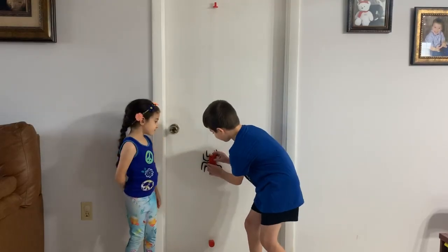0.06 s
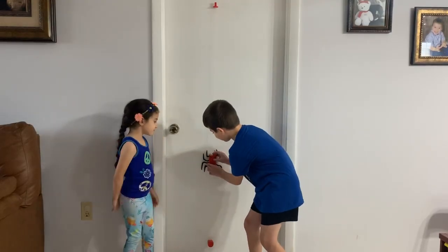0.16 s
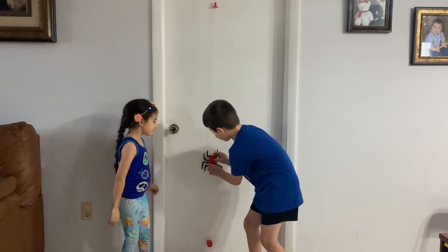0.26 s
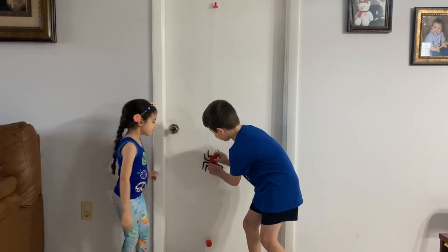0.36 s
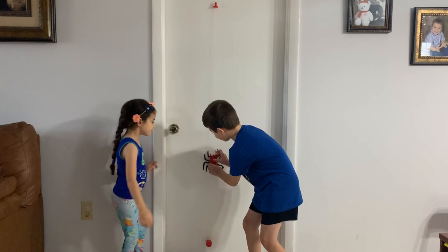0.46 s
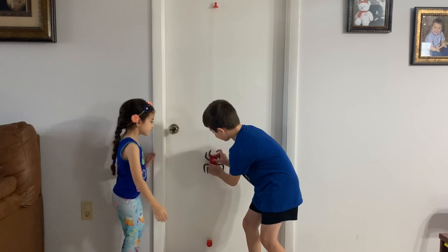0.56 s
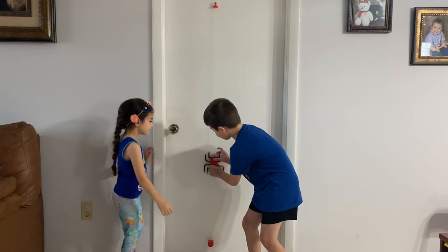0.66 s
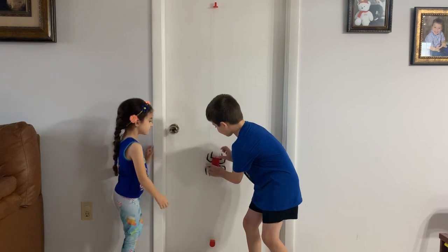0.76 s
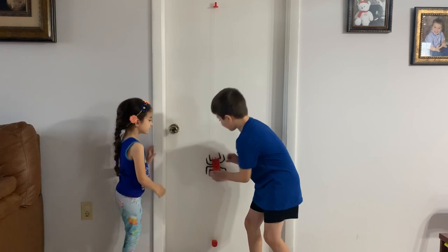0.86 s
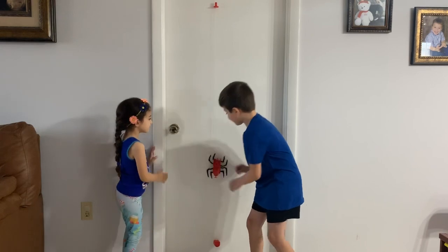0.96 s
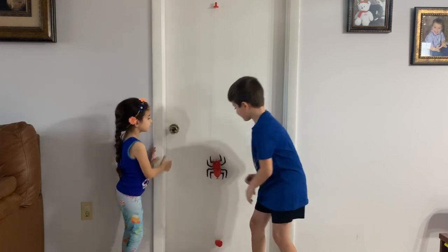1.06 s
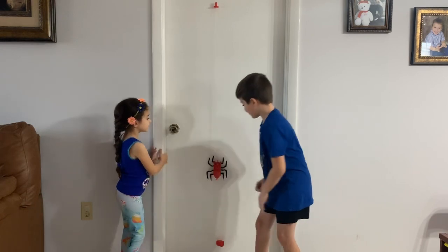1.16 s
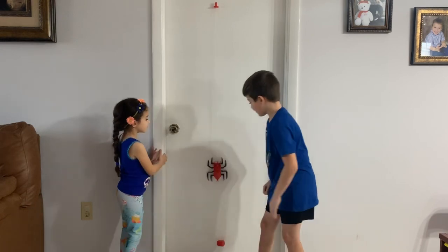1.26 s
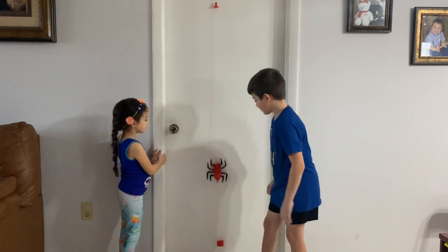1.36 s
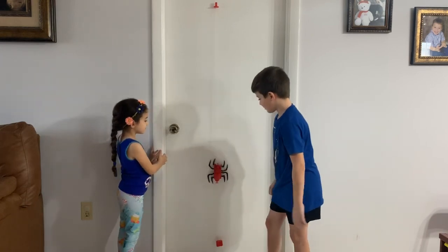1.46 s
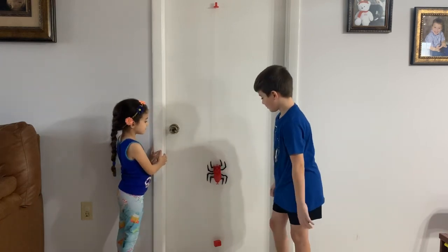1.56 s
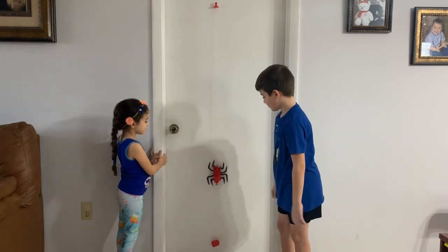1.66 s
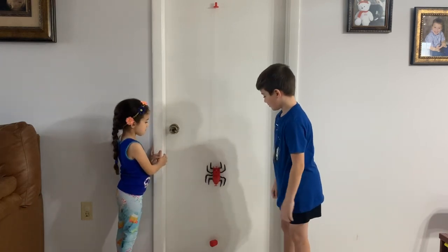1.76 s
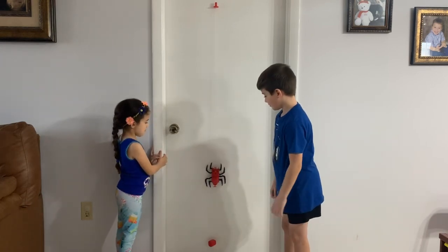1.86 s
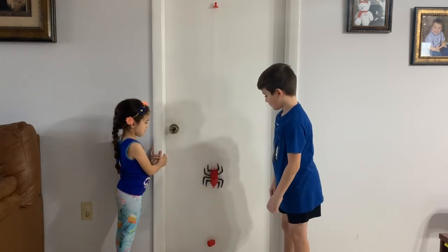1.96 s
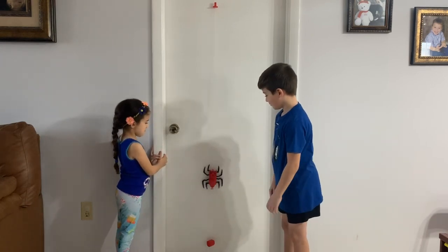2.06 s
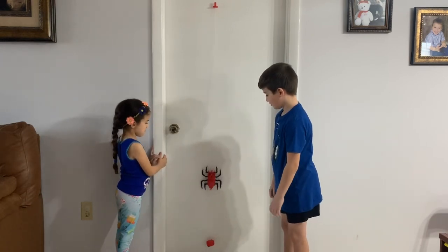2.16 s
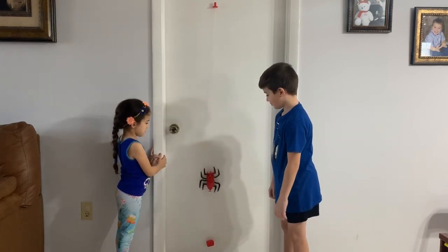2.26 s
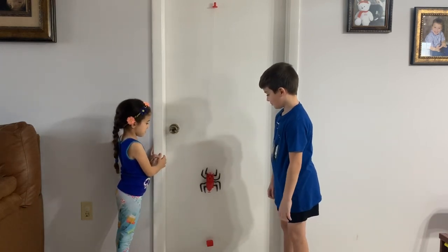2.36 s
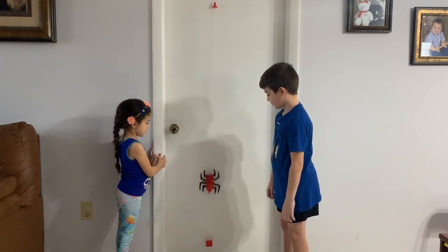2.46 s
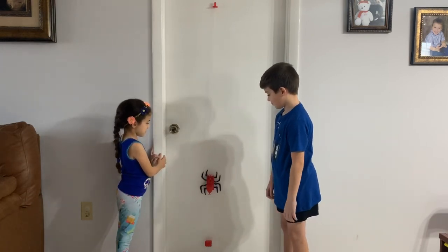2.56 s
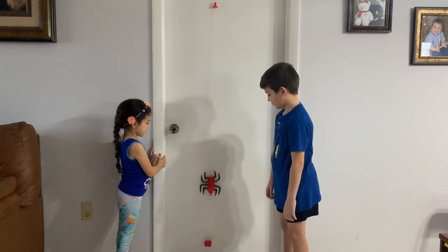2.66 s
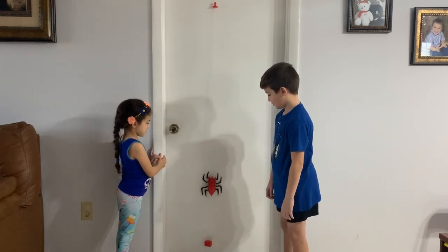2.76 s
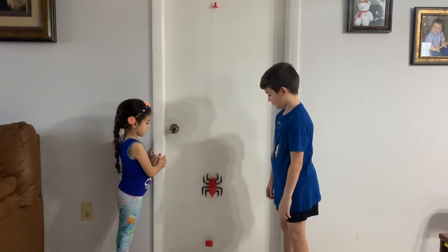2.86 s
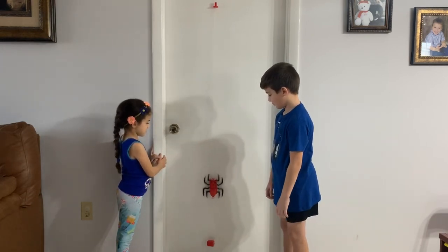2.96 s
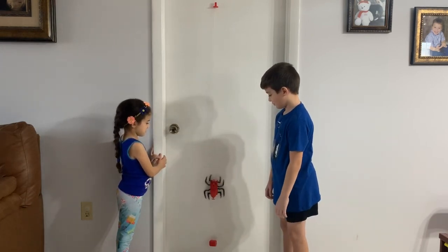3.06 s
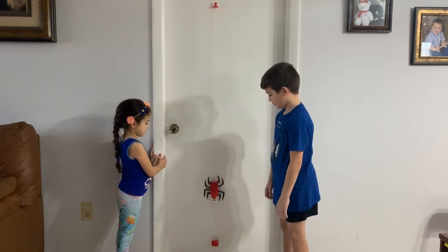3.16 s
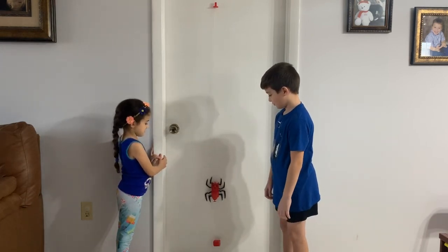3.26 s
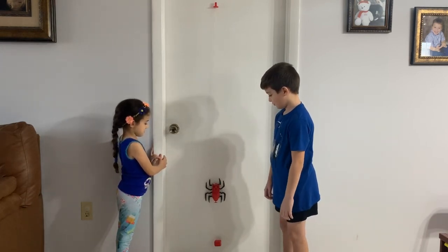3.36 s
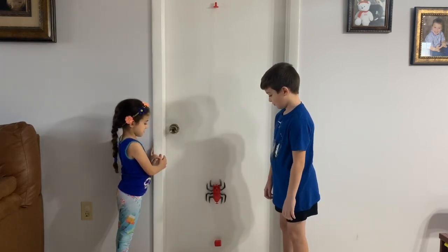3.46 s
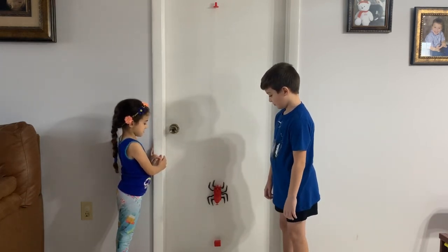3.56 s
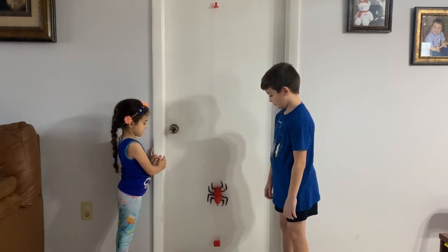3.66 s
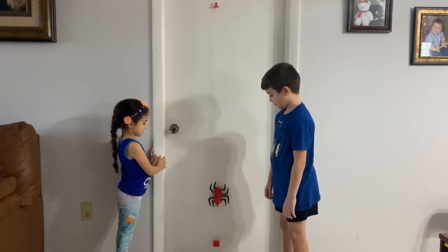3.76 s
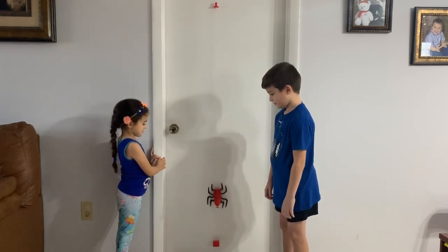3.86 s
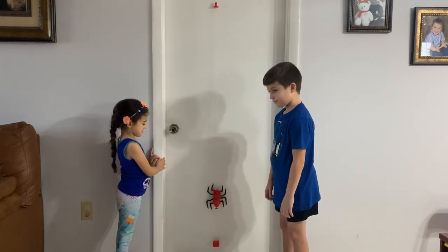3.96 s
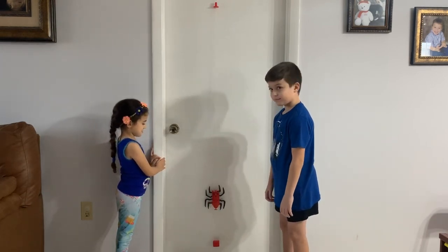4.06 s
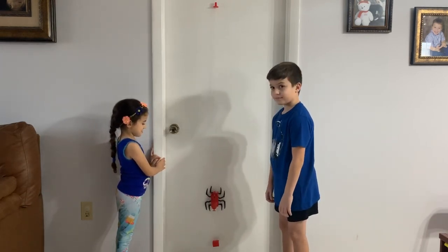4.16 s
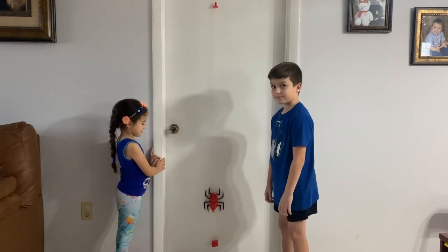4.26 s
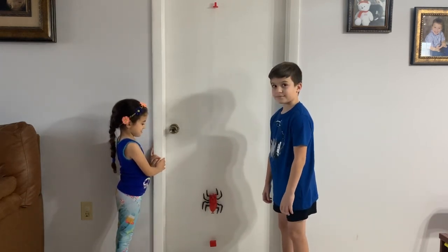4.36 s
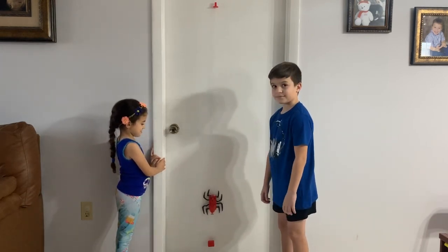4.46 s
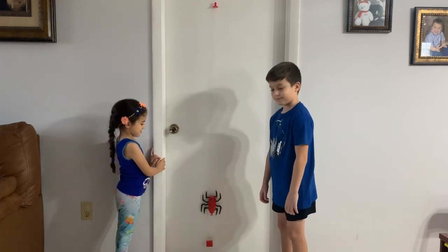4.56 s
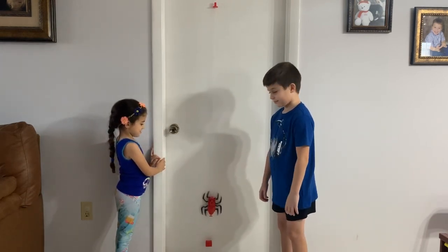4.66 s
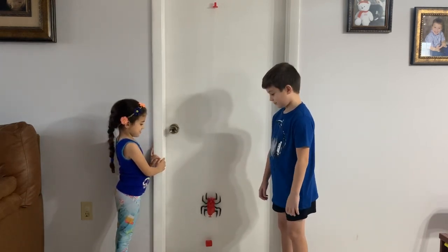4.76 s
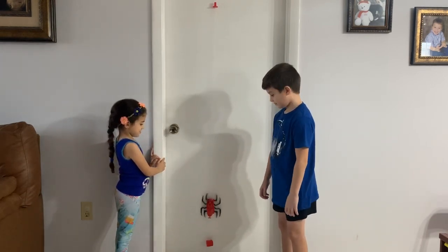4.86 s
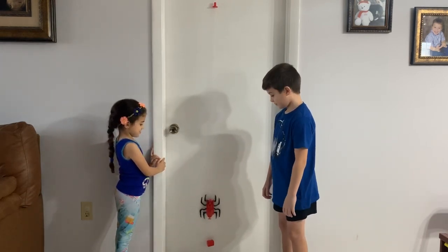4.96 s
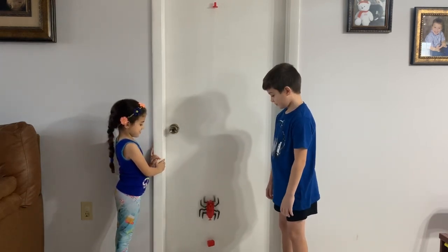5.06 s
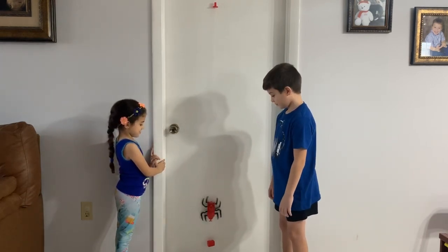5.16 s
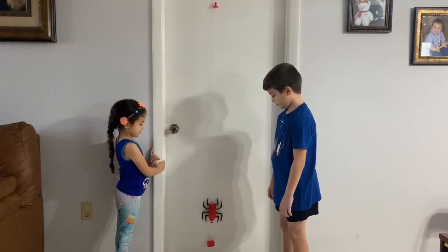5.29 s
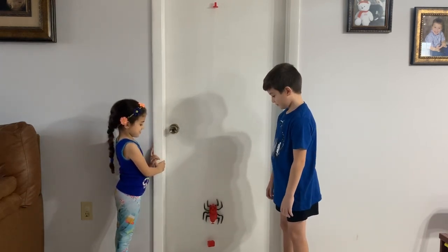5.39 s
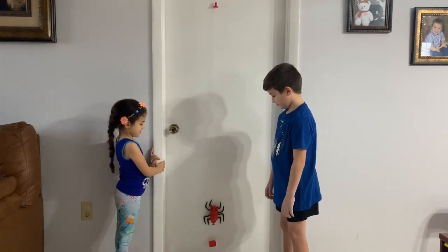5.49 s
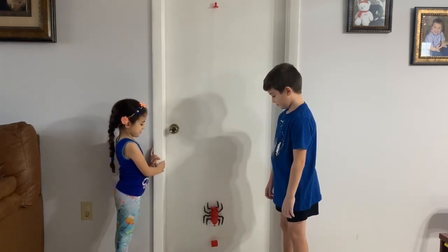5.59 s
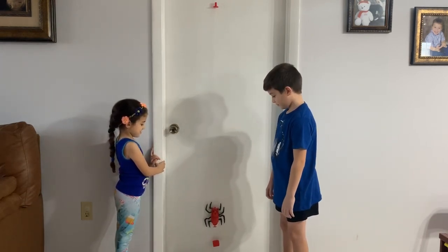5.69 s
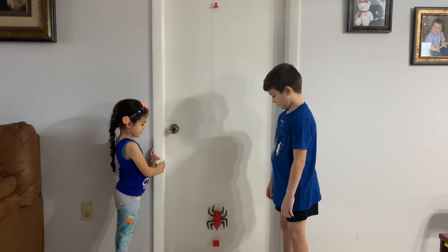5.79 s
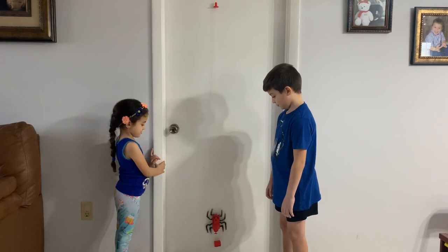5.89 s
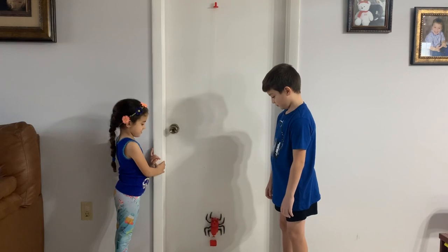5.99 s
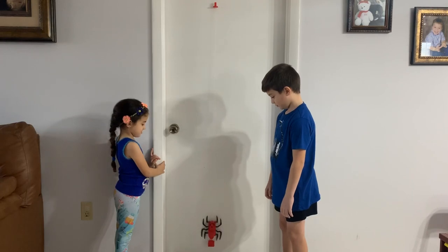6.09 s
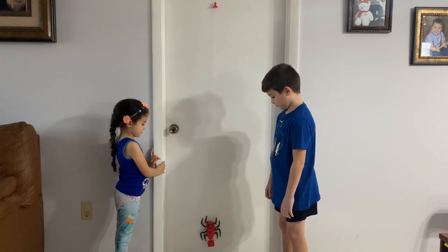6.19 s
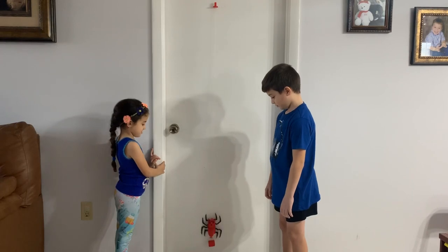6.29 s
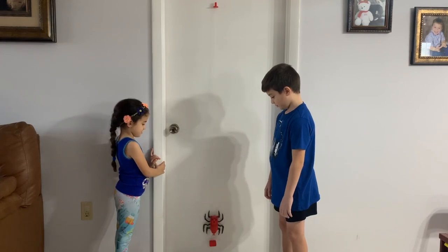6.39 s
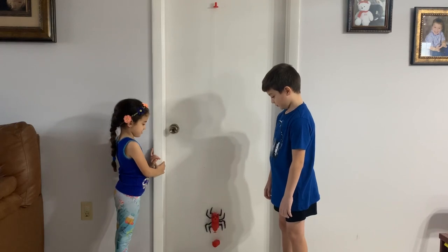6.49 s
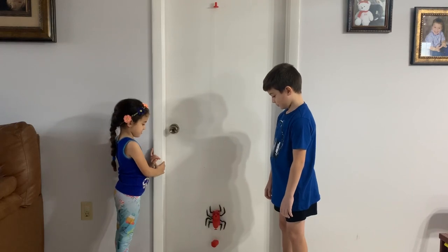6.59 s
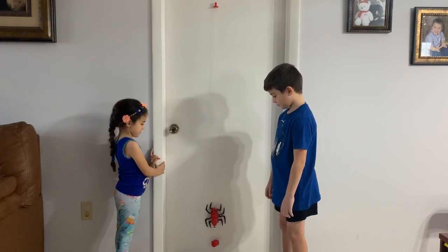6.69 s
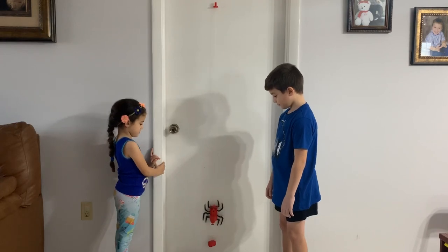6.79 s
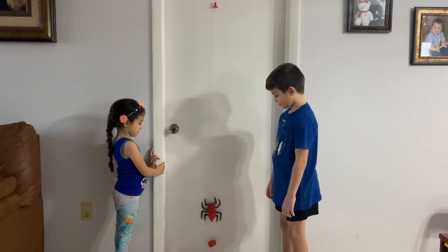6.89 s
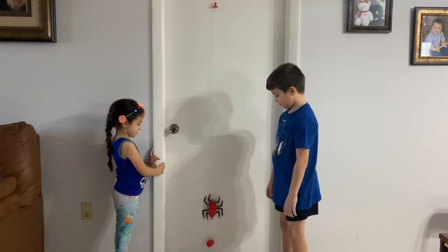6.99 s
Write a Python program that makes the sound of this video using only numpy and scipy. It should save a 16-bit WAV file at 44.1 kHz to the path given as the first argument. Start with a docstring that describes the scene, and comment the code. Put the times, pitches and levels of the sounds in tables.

```python
"""A living room: a toy robot is switched on and winds itself down a cord against a hollow wooden door, metres from a phone.
Random tooth contacts whir through resonances of its plastic shell; short noise bursts and rattles make the leg clacks.
Struck modes make the door thumps and hollow body knocks; near the bottom the drive falters into scrapes and ticks.
Fading noise tails echo the toy, over a low household hum of coloured noise and two narrow tones."""
import sys
import numpy as np
from scipy import signal
from scipy.fft import rfft, irfft
from scipy.io import wavfile
from scipy.ndimage import uniform_filter1d

SR = 44100
rng = np.random.default_rng(int(sys.argv[2]) if len(sys.argv) > 2 else 0)


def int16_out(signal):
    """Quantize to a 16-bit WAV file."""
    q = np.round(np.clip(np.atleast_2d(signal).T, -1, 1) * 32767)
    wavfile.write(sys.argv[1], SR, q.astype(np.int16))


N = 310023
T = np.arange(N) / SR

# resonances of the hollow door panel: pitch_hz, level_db, ring_ratio (relative ring time, scaled by each exciter)
DOOR_MODES = [(110, -52, 0.33), (133.4, -3, 1.04), (173.4, 1, 0.66), (202.7, 0.5, 0.42), (290, -0.5, 0.18),
              (310.4, -4, 0.79), (384.6, -3.5, 0.65), (474, -8.5, 0.74)]


def undb(db):
    """Decibels to amplitude."""
    return 10 ** (np.asarray(db) / 20)


def level(x, db):
    """Scale a sound to an RMS level in dB."""
    return x * undb(db) / np.sqrt(np.mean(x ** 2))


def colour(x, points):
    """Causal filter through (Hz, dB) points, from the folded cepstrum of the log gain."""
    hz, db = np.transpose(points)
    bin_hz = np.arange(2049) * SR / 4096
    gain_db = np.interp(np.log(bin_hz + 1), np.log(hz), db)
    cepstrum = irfft(np.log(undb(gain_db)))
    cepstrum[1:2048] *= 2
    cepstrum[2049:] = 0
    impulse = irfft(np.exp(rfft(cepstrum)))
    return signal.fftconvolve(x, impulse)[:len(x)]


def band(x, lo_hz, hi_hz):
    """Keep a band with gently sloping edges."""
    return signal.sosfilt(signal.butter(2, [lo_hz, hi_hz], "band", fs=SR, output="sos"), x)


def ring(x, hz, t60_s):
    """One decaying mode, struck by x; a unit blow peaks near 1."""
    pole = np.exp(2j * np.pi * hz / SR - np.log(1000) / (t60_s * SR))
    return signal.lfilter([1], [1, -pole], x).imag


def drifting_ring(x, hz, width_hz):
    """A resonance whose centre moves: shift down, smooth twice, shift back."""
    spin = np.exp(2j * np.pi * np.cumsum(hz) / SR)
    pole = np.exp(-np.pi * width_hz / SR)  # the width is that of each smoothing
    smooth_twice = np.convolve([1, -pole], [1, -pole])
    return (spin * signal.lfilter([1], smooth_twice, x / spin)).real


def walk(rate_hz):
    """A slow random control: levels held for 1 / rate_hz seconds and slewed twice."""
    hold = int(SR / rate_hz)
    steps = np.repeat(rng.standard_normal(N // hold + 1), hold)
    return uniform_filter1d(uniform_filter1d(steps, hold), hold)[:N]


def add(out, start_s, sound):
    """Mix a sound into out at a start time."""
    i = int(start_s * SR)
    out[..., i:i + sound.shape[-1]] += sound[..., :N - i]


def house():
    """A low hum that wavers, partly shared between the ports, and an appliance's mains tones as narrow noise."""
    # spectrum of the hum: pitch_hz, level_db (relative)
    hum_colour = [(25, -61), (55, 0.5), (80, -39), (120, -25), (170, -18.5), (270, -5), (390, -8.5),
                  (500, -21.5), (800, -24), (1700, -38.5), (2500, -31), (5000, -40), (11000, -45)]
    # mains tones: pitch_hz, level_db
    mains = [(59.5, -69), (119.5, -71)]
    hum_db = -59
    left_right = np.array([[1], [-1]])
    mid, side = (colour(rng.standard_normal(N), hum_colour) for _ in range(2))
    hum = undb(0.41 * walk(3.8)) * (mid + 0.46 * side * left_right)
    tones = np.zeros((2, N))
    for hz, db in mains:
        common, difference = level(ring(rng.standard_normal((2, N)), hz, 0.094), db)
        tones += common + 0.057 * difference * left_right  # nearly alike at both ports
    return tones + level(hum, hum_db)


def fingers():
    """Fingers on the switch: a faint, dull rub of two noise bands just before the motor starts."""
    start_s, steady_db = 0.227, -66.5  # level of the lower band before the envelope
    t = np.maximum(T - start_s, 0)
    low = level(band(rng.standard_normal(N), 850, 1600), steady_db)
    high = level(band(rng.standard_normal(N), 2000, 4500), steady_db - 7)
    return (low + high) * (1 - np.exp(-t / 0.0067)) * np.exp(-(t / 0.053) ** 2)


def shell(x):
    """The plastic shell: a broad colour with thin ringing panels on top."""
    # broad colour of the shell: pitch_hz, level_db
    shell_colour = [(500, -25.5), (800, -14), (1150, -11), (1600, 2.5), (2000, 2), (2800, -3.5), (3500, 0),
                    (4300, 2), (5500, 5), (6900, 1), (7800, 7), (9500, 0.5), (11000, -11)]
    # thin panels: pitch_hz, damping_hz (higher rings shorter and is driven harder), level_db
    shell_modes = [(1130, 13, -34), (1292, 84, 9.5), (1450, 42, -8.5), (1582, 26, -9), (1720, 93, 0),
                   (2500, 23, -8), (3400, 325, 0.5), (4060, 130, -3.5), (4280, 77, 1.5), (4590, 89, -0.5),
                   (5120, 560, -3), (7050, 280, -3.5)]
    panels = np.zeros(len(x))
    for hz, damping_hz, db in shell_modes:
        panels += undb(db) * damping_hz / 300 * ring(x, hz, 1.05 / max(damping_hz, 20))
    return colour(x + 0.083 * panels, shell_colour)


def legs():
    """Each clack is a short gritty noise burst and a fading rattle; a scrape is an even burst of contacts."""
    # leg clacks, about one per crank stroke with lighter ones between:
    # start_s, level_db (relative), pitch_hz (favoured), rattle_db (rattle drive)
    clacks = [(0.3807, -43, 4300, 0.5), (0.4912, -31, 4460, -11), (0.5677, -32.5, 3460, -2.5),
              (0.69, -37, 1450, -2.5), (0.771, -27, 1540, -7.5), (0.8677, -24, 1490, -13),
              (0.937, -19.5, 1480, -14.5), (1.0254, -23.5, 1410, -13.5), (1.0994, -25, 1490, -11.5),
              (1.1383, -30.5, 1720, -7), (1.2705, -30.5, 1660, -5.5), (1.4607, -23, 4120, -11),
              (1.5644, -25.5, 2260, -13), (1.6387, -30.5, 1360, -2), (1.8371, -30, 4430, -8),
              (1.937, -33.5, 3400, -10), (2.0086, -27.5, 4770, -7.5), (2.097, -26.5, 1640, -15),
              (2.166, -22, 3630, -12), (2.2543, -27.5, 4100, -8), (2.3394, -22, 1630, -11),
              (2.5197, -29, 1510, -8), (2.7073, -25, 4100, -8), (2.8861, -27.5, 4160, -6),
              (2.9843, -25.5, 3370, -22), (3.0604, -20, 4840, -14), (3.2198, -25, 4260, -7),
              (3.3862, -24.5, 4060, -9), (3.5662, -38, 4450, 1), (3.752, -27.5, 4540, -6),
              (3.857, -32, 3210, -21), (3.938, -25.5, 4130, -12), (4.0341, -26.5, 3940, -11),
              (4.0991, -27.5, 3360, -5), (4.2677, -26, 4470, -6.5), (4.4346, -25.5, 3960, -8),
              (4.596, -27.5, 4280, -6.5), (4.7103, -28.5, 4510, -26), (4.798, -27, 4730, -5.5),
              (4.9581, -33, 3900, -1), (5.1296, -35, 1450, 1.5), (5.2887, -33, 4570, -1),
              (5.4753, -25.5, 3480, -11), (5.6485, -21.5, 4500, -35), (5.7531, -28.5, 4330, -9.5),
              (5.8329, -24, 3430, -8.5), (5.895, -24, 4270, -10.5), (5.9561, -30, 4500, -3.5),
              (6.128, -30.5, 2240, -20), (6.326, -23.5, 1460, -27), (6.4317, -21.5, 4530, -15),
              (6.6152, -44, 1650, -7), (6.756, -37.5, 1560, -2), (6.9528, -24, 4120, -24),
              (7.009, -26, 2200, -15)]
    # scrapes of the faltering drive: start_s, level_db (relative), length_s
    scrapes = [(6.063, -31.5, 0.033), (6.179, -40, 0.027), (6.254, -39.5, 0.04), (6.368, -36.5, 0.043),
               (6.49, -40.5, 0.03), (6.685, -37, 0.041), (6.797, -35, 0.046)]
    falter_s, rattle_t60_s, falter_rattle_t60_s = 6.1, 0.32, 0.065  # the rattle dies sooner once it falters
    rattle_rise_s, spot_t60_s = 0.017, 0.025
    out, t = np.zeros(N), T[:SR // 4]
    for start_s, db, hz, rattle_db in clacks:
        noise = rng.standard_normal(len(t))
        grit = rng.random(len(t)) < .3
        click = noise * grit * (1 - np.exp(-t / .002)) * np.exp(-(t / .005) ** 2)
        t60_s = rattle_t60_s if start_s < falter_s else falter_rattle_t60_s
        rattle = noise * (1 - np.exp(-t / rattle_rise_s)) * 1000. ** (-t / t60_s)
        blow = 0.24 * click / np.std(click[:SR // 100]) + undb(rattle_db) * rattle
        spot = 0.019 * ring(blow, hz, spot_t60_s)  # the struck spot favours one pitch
        add(out, start_s - .002, undb(db) * (blow + spot))
    for start_s, db, length_s in scrapes:
        edge = np.clip(np.minimum(t / .005, (length_s - t) / .008), 0, 1)
        contacts = rng.standard_normal(len(t)) * (rng.random(len(t)) < .3)
        add(out, start_s, undb(db) * edge * contacts)
    return shell(out) / np.std(shell(rng.standard_normal(N)))


def door():
    """Soft, rattling blows shake the door panel's modes; separate hollow knocks ring at their own times."""
    # body against the panel: start_s, peak_db (before the last filter), shake_t60_s,
    # hardness_db_per_octave (tilt of the modes about 200 Hz)
    thumps = [(0.391, -33, 1, -3.5), (0.832, -32.5, 0.7, 1), (0.937, -38, 0.39, 6), (1.205, -40.5, 0.4, 0),
              (1.305, -44, 0.45, -1), (1.422, -44, 0.51, -2), (1.514, -41.5, 0.54, 16),
              (1.72, -40.5, 0.62, -4), (1.972, -39, 0.69, -3.5), (2.4, -40.5, 0.28, -2),
              (2.726, -42, 0.72, -8), (3.254, -45.5, 0.45, -6), (3.352, -37, 0.54, -2),
              (3.672, -36.5, 0.45, 3), (3.944, -45, 0.76, -8), (4.47, -31, 0.55, 4),
              (4.867, -35.5, 0.45, 3.5), (5.026, -32.5, 0.39, 3), (5.197, -42, 0.31, 3),
              (5.304, -42.5, 0.37, 1), (5.682, -43, 0.56, 4), (5.833, -40.5, 1, 2), (6.299, -36, 0.19, 3),
              (6.366, -40, 0.45, 2), (6.49, -43, 0.97, 3), (6.697, -40, 0.21, 12), (6.811, -41, 0.47, 7)]
    # hollow plastic knocks: start_s, peak_db (before the last filter), pitch_hz
    knocks = [(0.929, -41, 680), (1.106, -37.5, 811), (1.456, -42, 798), (2.636, -43.5, 834),
              (3.054, -43.5, 865), (3.941, -39.5, 1050), (4.096, -32, 1049), (4.686, -35, 1050),
              (5.281, -43, 1060), (6.101, -40, 995)]
    knock_t60_s, neighbour_db = 0.16, -1
    out, t = np.zeros(N), T[:SR // 2]
    for start_s, db, shake_t60_s, hard_db in thumps:
        shake = rng.standard_normal(len(t)) * 1000. ** (-t / max(shake_t60_s, .03))
        push = band(1. * (t == 0) + 0.067 * shake, 121, 1180)
        # mode levels and pitches scatter from blow to blow
        scatter = rng.standard_normal((len(DOOR_MODES), 2))
        thump = np.zeros(len(t))
        for (hz, mode_db, ratio), (level_shift, pitch_shift) in zip(DOOR_MODES, scatter):
            gain = undb(mode_db + 2 * level_shift + hard_db * np.log2(hz / 200))
            thump += gain * ring(push, hz * (1 + 0.0045 * pitch_shift), 0.061 * ratio)
        add(out, start_s - .002, undb(db) * thump / np.abs(thump).max())
    for start_s, db, hz in knocks:
        envelope = t * (np.exp(-t / 0.0016) + 0.015 * np.exp(-t / 0.021))
        tick = band(rng.standard_normal(len(t)) * envelope, 760, 1050)
        neighbours = ring(tick, 0.95 * hz, 0.042) + ring(tick, 1.12 * hz, 0.045)
        body = ring(tick, hz, knock_t60_s) + undb(neighbour_db) * neighbours
        add(out, start_s - .003, undb(db) * body / np.abs(body).max())
    return band(out, 97, 3200)  # a thin panel sends out no deep bass


def gears():
    """Tooth contacts of scattered size, bunched once a shaft turn; some shakes through into the door."""
    # gear train: start_s, level_db (whir before the panel joins), rumble_db (door rumble against the whir)
    gear_train = [(0.38, -52, -13), (0.56, -43.5, -8), (0.67, -44, -23), (0.96, -40.5, -19.5),
                  (1.6, -44, -14), (1.86, -42.5, -20), (2.16, -41, -16), (2.76, -43.5, -16.5),
                  (3.23, -39, -16.5), (3.53, -43, -22), (3.82, -42, -26), (4.14, -39.5, -23),
                  (4.85, -43.5, -24), (5.32, -38, -24), (5.91, -43.5, -21), (6.13, -50.5, -19),
                  (6.56, -52, -7.5), (7.03, -51.5, -8.5)]
    # a low panel of the shell, whose ring drifts as the toy descends, the last row holding:
    # start_s, pitch_hz, level_db (against the whir)
    low_panel = [(0.5, 1440, -16.5), (1.05, 1500, -13), (1.16, 1620, -13), (1.68, 1510, -11),
                 (1.83, 1530, -12), (3.96, 1615, -13.5), (4.77, 1575, -13.5), (6.0, 1590, -11.5),
                 (6.2, 1480, -11.5)]
    shaft_hz, switch_on_s, panel_width_hz = 151, 0.43, 220
    catch_s, catch_length_s, catch_db = 5.625, 0.0066, -11  # the gears catch for an instant
    start_s, whir_db, rumble_db = np.transpose(gear_train)
    shaft_turns = np.cumsum(shaft_hz * (1 + 0.02858 * walk(3))) / SR
    teeth = rng.standard_normal(N) * (rng.random(N) < .1) * undb(1.08 * rng.exponential(size=N))
    teeth = teeth * (1 + .4 * np.cos(2 * np.pi * shaft_turns))
    teeth = teeth * undb(1.2 * walk(40))
    catch = catch_db * np.exp(-((T - catch_s) / catch_length_s) ** 2)
    effort = undb(np.interp(T, start_s, whir_db) + catch) * (T > switch_on_s)

    rumble = sum(undb(db) * ring(teeth, hz, 0.25 * ratio) for hz, db, ratio in DOOR_MODES)
    rumble = undb(np.interp(T, start_s, rumble_db)) * level(band(rumble, 96, 1500), 0)

    # the whir's tone flickers: each band swells at random
    edges_hz = 500 * 2 ** np.arange(0, 4.8, 1 / 3)
    whir = np.zeros(N)
    for lo_hz, hi_hz in zip(edges_hz, edges_hz[1:]):
        whir += undb(1.1 * walk(25)) * band(teeth, lo_hz, hi_hz)

    panel_s, panel_hz, panel_db = np.transpose(low_panel)
    panel = drifting_ring(teeth, np.interp(T, panel_s, panel_hz), panel_width_hz)
    panel = level(panel, 0) * undb(np.interp(T, panel_s, panel_db))
    return effort * (level(shell(whir), 0) + panel), effort * rumble


def room(x):
    """A gap, then a dense fading noise tail, different at each port and redrawn at random over time."""
    room_t60_s, gap_s, tail_db = .1, .003, -4.5  # tail level before the colour
    t, out = T[:int(SR * .4)], np.zeros((2, N))
    hop = SR // 16  # a new pair of tails every sixteenth of a second, cross-faded
    fade = np.sin(np.pi * np.arange(2 * hop) / (2 * hop))
    x = colour(x, [(90, -5.0), (250, -6.5), (1000, 5.5), (6000, 3.5), (8500, -7.0), (11000, -2.5)])
    for i in range(0, N - hop, hop):
        tails = rng.standard_normal((2, len(t))) * 1000. ** (-t / room_t60_s) * (t > gap_s)
        tails = level(tails, tail_db) / np.sqrt(len(t))
        part = x[i:i + 2 * hop]
        add(out, i / SR, signal.fftconvolve(tails, part[None] * fade[:len(part)]))
    return out


def scene():
    """The toy, its echo in the room and the hum of the house."""
    whir, rumble = gears()
    toy = whir + rumble + legs() + door() + fingers()
    return toy + room(toy) + house()


def record(dry):
    """The phone's two ports hear each pitch a little apart in phase and level; deep bass and top are cut."""
    # phase between the ports: pitch_hz, left_lead_rad
    port_phase = [(0, 0), (1000, -.5), (2000, .2), (3300, 1.1), (5000, .9), (6300, -.2), (8300, -3.1),
                  (8900, -3.3), (10700, -6.2), (22050, -6.3)]
    # balance between the ports: pitch_hz, left_minus_right_db
    port_balance = [(60, -4), (110, 2.5), (190, -1), (340, 1.5), (610, 1), (1090, 1), (1950, 2),
                    (3490, -0.5), (6230, -2.5), (11100, 1)]
    top_hz, bass_cut_hz = 10950, 42
    hz = np.arange(N // 2 + 1) * SR / N
    phase = np.interp(hz, *np.transpose(port_phase))
    balance_db = np.interp(hz, *np.transpose(port_balance))
    left = np.exp(.5j * phase) * undb(.5 * balance_db)  # each port takes half the difference
    ports = irfft(rfft(dry) * np.array([left, 1 / left]), N)
    ports = signal.sosfilt(signal.butter(4, bass_cut_hz, "high", fs=SR, output="sos"), ports)
    return signal.sosfilt(signal.ellip(12, .2, 90, top_hz, fs=SR, output="sos"), ports)


dry = scene()
out = record(dry)
int16_out(out)
```